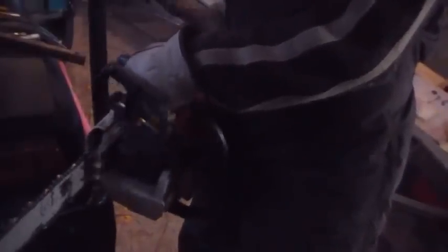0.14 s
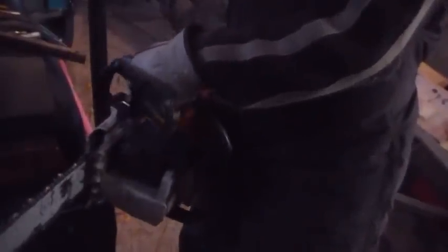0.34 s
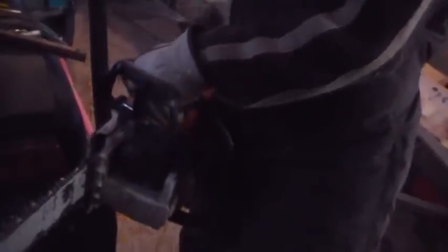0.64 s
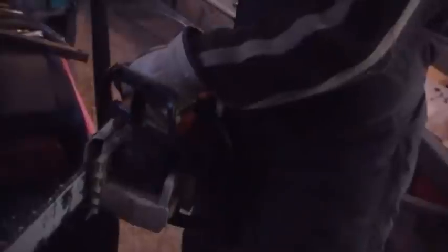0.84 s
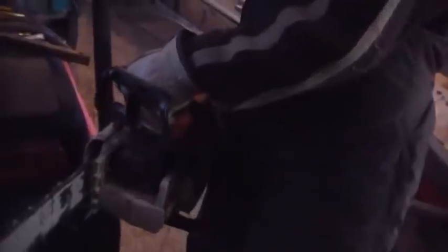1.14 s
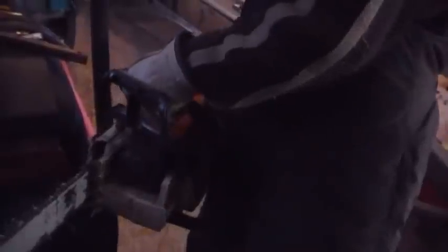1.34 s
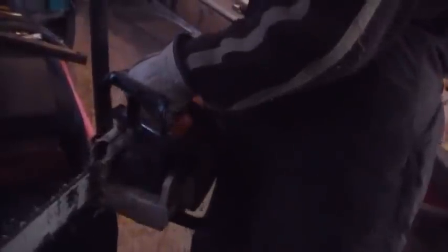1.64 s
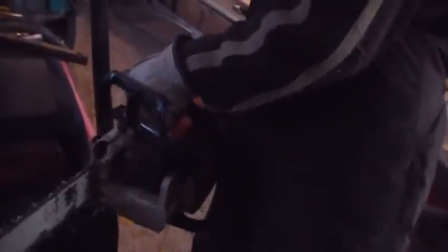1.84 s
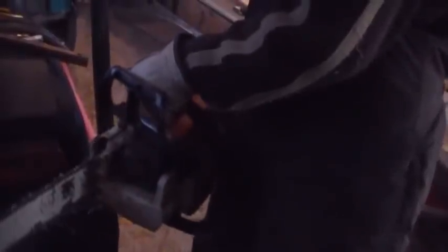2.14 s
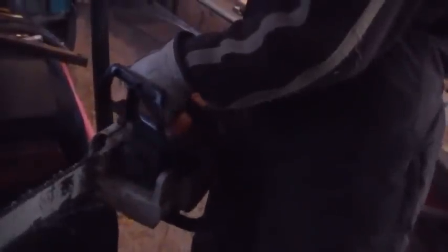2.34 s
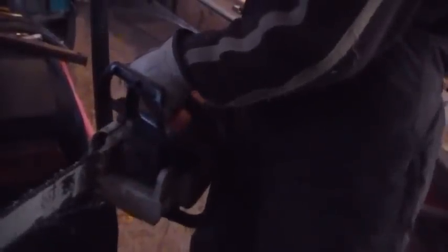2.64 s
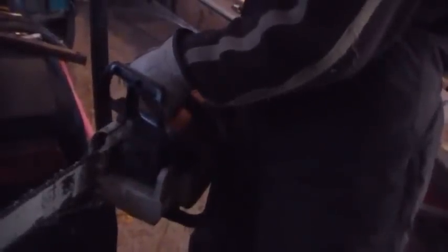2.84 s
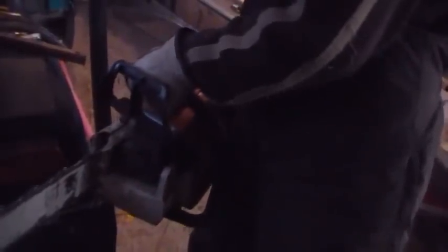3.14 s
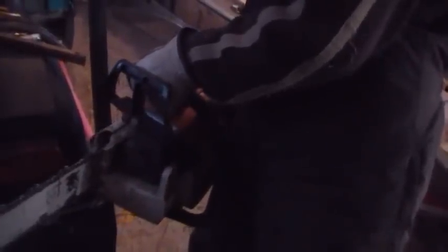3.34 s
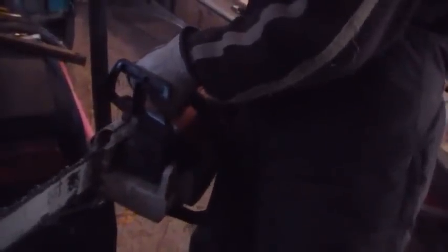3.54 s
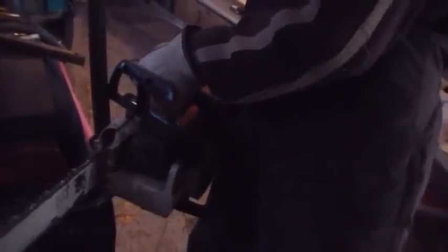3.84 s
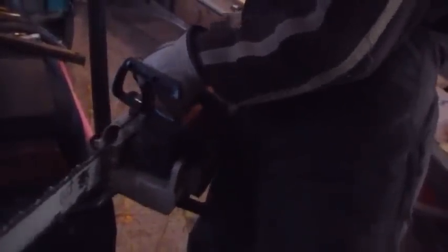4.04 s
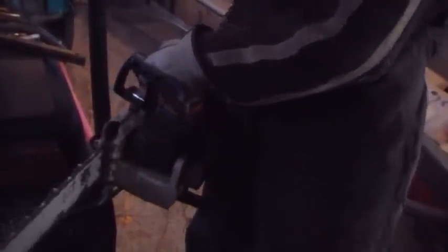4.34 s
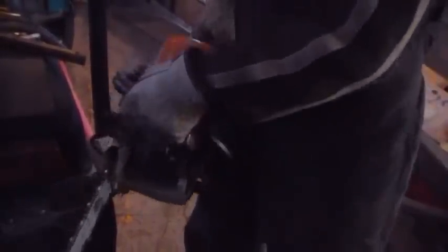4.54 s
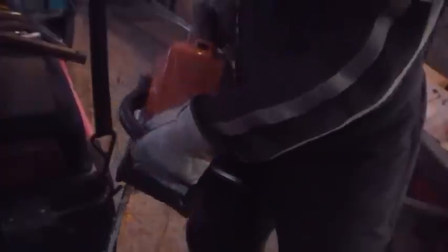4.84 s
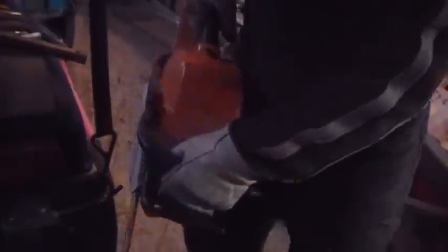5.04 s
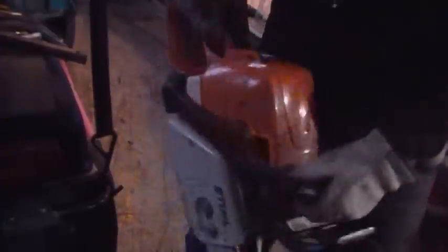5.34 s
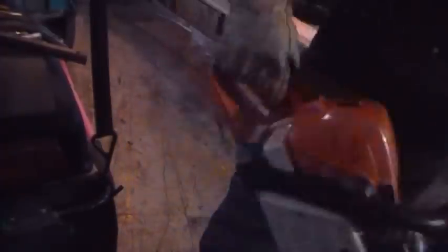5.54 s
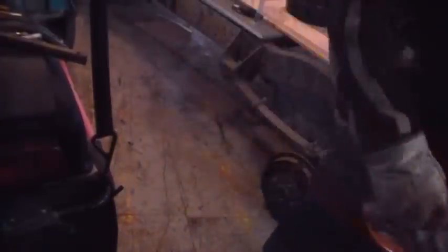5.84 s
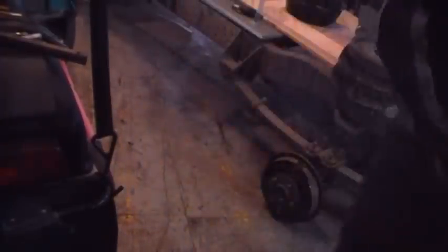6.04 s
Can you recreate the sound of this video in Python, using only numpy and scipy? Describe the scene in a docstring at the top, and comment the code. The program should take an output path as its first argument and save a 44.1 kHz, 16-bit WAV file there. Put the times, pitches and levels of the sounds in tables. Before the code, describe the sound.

A two-stroke chainsaw idles unevenly with rattling metal, is cut off, squeals and clanks to a stop, then is set down with a ringing thud.

```python
"""Two-stroke chainsaw switched off and set down

The saw idles in a workshop, firing hard on every fourth or fifth turn: shaped noise bursts and impulses.
The spark is cut; slowing turns jolt a rattling chain, which squeals, and ringing clanks end the run.
Cloth swishes and scuffs (noise grains), a sole scrapes, knocks sound and the saw lands with a ringing thud.
A soft hiss lies beneath; a thin whine of resonant noise comes up as the engine falls quiet."""
import sys
import numpy as np
from scipy import signal
from scipy.fft import rfft, irfft
from scipy.io import wavfile

SR = 44100
rng = np.random.default_rng(int(sys.argv[2]) if len(sys.argv) > 2 else 0)


def transcribe(u):
    """Save the signal u as a 16-bit wav file named by the first command-line argument.

    u: samples, shape (n,) or (channels, n), limited to [-1, 1]; the rate is SR.
    q: integer samples, one column per channel.
    """
    v = np.clip(np.atleast_2d(u).T, -1, 1)
    q = np.round(v * 32767).astype(np.int16)
    wavfile.write(sys.argv[1], SR, q)


N = 272538
T = np.arange(N) / SR

# turns that stand out, as loud firings or as loud metal slaps with almost no crack:
# (time [s], exhaust crack level [dB], metal slap level [dB])
STRONG_TURNS = [(0.170, -8.5, -20), (0.216, -34, -16), (0.2636, -11, -33), (0.3593, -10, -23),
                (0.456, -7.5, -11), (0.5239, -36, -12), (0.5509, -9, -20), (.594, -22, -10.5),
                (0.617, -35, -7.5), (0.8068, -10, -32), (0.875, -19, -8), (0.9, -8, -22),
                (0.995, -7.5, -22), (1.2446, -9.5, -32), (1.3556, -6.5, -37), (1.4865, -12.5, -32),
                (1.5953, -9, -13), (1.7054, -7.5, -24), (1.889, -37, -12), (1.9132, -8, -17),
                (2.0272, -8, -20), (2.1355, -12.5, -22), (2.2218, -8.5, -19), (2.3305, -9.5, -30),
                (2.4197, -11, -35), (2.507, -10, -29), (2.5952, -12.5, -33), (2.618, -19, -18),
                (2.8021, -13, -41), (2.893, -7.5, -16), (3.21, -11, -40), (3.3278, -7.5, -18),
                (3.4217, -12, -17)]
# the idle hunts slowly up and down, then dies: (time [s], effort [dB])
EFFORT = [(0, -30), (.06, -24.5), (.45, -26), (.78, -22.5), (1.04, -26.5), (1.23, -24.5), (1.43, -27.5),
          (1.58, -25.5), (1.75, -26.5), (1.88, -25), (2.03, -27.5), (2.48, -26.5), (2.79, -21.5),
          (2.95, -24), (3.21, -21), (3.43, -25), (3.65, -25.5), (3.86, -33.5)]
# resonances of the slack chain: (frequency [Hz], width [Hz], relative level [dB])
LOOSE_CHAIN = [(1250, 210, -7), (1700, 70, -4), (2015, 70, -1), (2215, 36, 3), (2510, 100, 4),
               (2720, 70, 2), (3110, 70, 1), (3460, 150, 0), (3980, 60, -7), (4640, 200, 0)]


def amp(db):
    """Decibels to gain."""
    return 10 ** (np.asarray(db) / 20)


def noise():
    """White noise of rms 1."""
    return rng.standard_normal(N)


def through(x, response):
    """Pass x through an impulse response scaled to unit energy."""
    return signal.fftconvolve(x, response / np.linalg.norm(response))[:N]


def colour(x, points, size=4096):
    """Minimum-phase filter with the given (Hz, dB) shape; white noise keeps its level."""
    hz, db = np.transpose(points)
    freqs = np.maximum(np.fft.rfftfreq(size, 1 / SR), 1)
    shape_db = np.interp(np.log(freqs), np.log(hz), db)
    # folding the cepstrum forward in time makes the response causal
    cepstrum = irfft(np.log(amp(shape_db)))
    cepstrum[1:size // 2] *= 2
    cepstrum[size // 2 + 1:] = 0
    return through(x, irfft(np.exp(rfft(cepstrum))))


def ring(x, modes, size=8192):
    """Damped resonances (Hz, width Hz, dB), narrow ones ringing longer; white noise keeps its level."""
    t = T[:size]
    response = np.zeros(size)
    for hz, width, db in modes:
        response += amp(db) * width * np.exp(-np.pi * width * t) * np.cos(2 * np.pi * hz * t)
    return through(x, response)


def blows(times, db):
    """One impulse at each time."""
    out = np.zeros(N)
    inside = (times >= 0) & (times < T[-1])
    np.add.at(out, (times[inside] * SR).astype(int), amp(db)[inside])
    return out


def bursts(times, db, rise, hold, decay, size=8192):
    """Noise bursts that open quickly, stay open briefly and die away (all in s)."""
    t = T[:size]
    shape = (1 - np.exp(-t / rise)) * np.exp(-np.maximum(t - hold, 0) / decay)
    return noise() * signal.fftconvolve(blows(times, db), shape)[:N]


def grains(rate, spread_db):
    """Dense random ticks (rate per s) of uneven size, rms 1."""
    ticks = (rng.random(N) < rate / SR) * noise() * amp(spread_db * noise())
    return ticks / np.std(ticks)


def rub(path, width_hz):
    """One narrow, rough resonance that glides along rows of (s, Hz, dB)."""
    s, hz, db = np.transpose(path)
    lowpass = signal.butter(2, width_hz / 2, fs=SR, output="sos")
    rough = signal.sosfilt(lowpass, noise() + 1j * noise())
    phase = 2 * np.pi * np.cumsum(np.interp(T, s, hz)) / SR
    tone = np.real(rough * np.exp(1j * phase))
    return tone / np.std(tone) * np.interp(T, s, amp(db), left=0, right=0)


def crank_turns():
    """Start of every turn: a whole number of even turns, near idle speed, fits between two strong ones."""
    idle_hz = 44
    strong = np.array(STRONG_TURNS)[:, 0]
    anchors = np.append(strong[0] - 8 / 43.3, strong)
    spans = []
    for start, end in zip(anchors, anchors[1:]):
        turns = round((end - start) * idle_hz)
        spans.append(np.linspace(start, end, turns + 1)[1:])
    return np.concatenate(spans)


def effort(t):
    """Engine effort in dB at times t: slow hunting, less the slump until fresh mixture builds up."""
    full_crack_db, blowdown_s = -7, 0.008
    # the harder the firing, the more spent the cylinder and the weaker the turns after it
    spent_db, spent_power, recharge_s = 11, 5.4, 0.065
    strong, crack_db, _ = np.transpose(STRONG_TURNS)
    db = np.interp(t, *np.transpose(EFFORT))
    for s, strength in zip(strong + blowdown_s, amp(crack_db - full_crack_db)):
        recovery = (t > s) * np.exp(-np.abs(t - s) / recharge_s)
        db = db - spent_db * strength ** spent_power * recovery
    return db


def casing(x, first_db=-4, second_db=-7):
    """The casing rings; as the grip shifts, some of its panels fall silent and others start to buzz."""
    # casing modes throughout, before and after the shift: (frequency [Hz], width [Hz], relative level [dB])
    casing_modes = [(1615, 40, -10), (1822, 40, -8), (1962, 40, -2), (2220, 26, 6), (2520, 45, -5),
                    (2703, 40, -3), (2900, 60, -5), (3020, 40, 0), (3197, 40, -5), (3430, 35, -3),
                    (4240, 110, -8), (4414, 54, -10), (4690, 80, -5), (6216, 50, -8)]
    first_grip = [(1958, 32, 1), (2703, 26, 1), (2855, 30, 1), (3348, 22, 3), (3500, 25, -3),
                  (4212, 30, -3)]
    second_grip = [(2448, 28, 2), (2490, 32, 1), (3060, 50, -4)]
    shifted = np.interp(T, [0.9, 1.2], [0, 1])
    first = amp(first_db) * ring((1 - shifted) * x, first_grip)
    second = amp(second_db) * ring(shifted * x, second_grip)
    return ring(x, casing_modes) + first + second


def idle(puff_db=7.5, scatter_db=1, thump_lag=0.0048, knock_db=-7, bang_db=6.5,
         jet_db=1, tail_db=-4.0, tick_db=29, pulse_db=11):
    """Each turn puffs, slaps and thumps the muffler; a firing knocks, bangs and spits a short bright jet."""
    # modes of muffler and slapped bar: (frequency [Hz], width [Hz], relative level [dB])
    muffler_modes = [(235, 80, -9), (295, 70, -12), (420, 36, -7), (461, 34, 8), (645, 50, 1),
                     (830, 130, -8), (1105, 45, 2.5)]
    slap_modes = [(9122, 85, 6), (9400, 230, -4)]
    # spectra: (frequency [Hz], relative level [dB])
    puff_shape = [(100, -43), (400, -22.5), (1000, -2.5), (1700, 2.5), (2330, 3), (2550, 13), (2800, 8),
                  (3300, 6.5), (3900, 4.5), (4600, 4.5), (5100, 2), (8300, 4), (10000, 9.5), (11500, 3.5),
                  (13000, -0.5), (16000, -9.5)]
    knock_shape = [(200, -24), (1500, -3), (2700, 5.5), (3700, 0), (4600, -4), (5500, -3), (6500, 5),
                   (10000, 4), (12000, 3), (16000, -8)]
    jet_shape = [(500, -13), (2500, -2.5), (4500, -3), (6000, -2.5), (9000, 1), (10500, 2), (12000, -1),
                 (14000, 2), (16000, -4.5)]
    # the crack is bright gas noise; the bang is lower and duller
    crack_shape = [(80, -64), (450, -28), (1000, -4.5), (2000, 6), (3000, 5), (4900, -3.5), (6000, 6.5),
                   (8500, 4), (10700, 8.5), (14000, -1.5), (16000, -11)]
    bang_shape = [(80, -20), (200, -14), (450, -4.5), (1000, 3.5), (1700, 5), (3000, 2.5), (6000, -9),
                  (16000, -43)]
    muffler_shape = [(60, -54), (110, -29), (165, 1), (260, 2.5), (1200, -2.5), (3000, -2.5), (16000, -13.5)]

    times = crank_turns()
    turn_db = effort(times)
    chance = rng.standard_normal((len(times), 4)).T
    strong, crack_db, slap_db = np.transpose(STRONG_TURNS)

    puff_levels = turn_db + puff_db + scatter_db * chance[0]
    puffs = bursts(times, puff_levels, rise=0.0005, hold=0.0032, decay=0.0045)
    slap_times = np.append(times, strong)
    slap_levels = np.append(turn_db + 6.0 + 2.1 * chance[1], slap_db - 5.5)
    slaps = bursts(slap_times, slap_levels, rise=0.00037, hold=0.003, decay=0.0014)
    knocks = bursts(strong, crack_db + knock_db, rise=0.00063, hold=0.0033, decay=0.0021)
    # the jet of burnt gas follows the knock and is over at once
    jets = bursts(strong + 0.0054, crack_db + jet_db, rise=0.0002, hold=0.0012, decay=0.0006)
    cracks = bursts(strong + thump_lag, crack_db + tail_db, rise=0.00024, hold=0.0009, decay=0.0047)
    # the piston strikes the same clean tick into the casing on every turn
    ticks = blows(times, turn_db + tick_db)
    # the pressure pulse keeps one shape, soft unless it fires; the gas noise on top of it differs
    bangs = blows(strong + thump_lag, crack_db + bang_db) + blows(times + thump_lag, turn_db + pulse_db)
    # gas leaves the muffler a few milliseconds after the turn starts, never quite evenly
    thump_times = times + thump_lag + 0.0005 * chance[3]
    thumps = blows(thump_times, turn_db + 10.5 + 1.6 * chance[2]) + amp(-27) * puffs

    muffler = colour(ring(thumps, muffler_modes), muffler_shape)
    firing = colour(knocks, knock_shape) + colour(jets, jet_shape)
    firing = firing + colour(cracks, crack_shape) + colour(bangs, bang_shape)
    metal = amp(-13) * casing(puffs + ticks) + ring(slaps, slap_modes)
    return colour(puffs, puff_shape) + metal + firing + amp(-0.5) * muffler


def chain(settle_db_per_s=34):
    """Links and loose parts chatter with the engine's effort, ring casing and bar, then settle."""
    # bar modes: (frequency [Hz], width [Hz], relative level [dB])
    bar_modes = [(9050, 55, 0), (9230, 70, -7), (9925, 80, -10), (10450, 70, -12), (13600, 400, -22)]
    # spectrum of the rattling links: (frequency [Hz], relative level [dB])
    rattle_shape = [(100, -46.5), (300, -4), (1000, -4.5), (1700, 1.5), (2330, 5.5), (2700, -1.5),
                    (4500, 4), (5300, -7), (8300, -3.5), (10000, -4), (12000, 1), (16000, -46)]
    shake = amp(effort(T) - settle_db_per_s * np.maximum(T - EFFORT[-1][0], 0))
    ticks = shake * grains(rate=9000, spread_db=1.5)
    running = np.interp(T, [3.66, 3.85], [1, 0.3])
    # once the spark is cut the chain goes slack and its own rattle takes over from the casing's
    slack = np.interp(T, [3.45, 3.62], [0, 1])
    metal = amp(-7.5) * ((1 - slack) * casing(ticks) + slack * ring(ticks, LOOSE_CHAIN))
    rattle = amp(-2.5) * colour(ticks, rattle_shape)
    bar = amp(-7.5) * running * ring(ticks, bar_modes)
    return metal + running * (rattle + bar)


def background():
    """Soft hiss that dips briefly after the thud, and a thin whine that comes up once the engine is quiet."""
    # spectrum of the hiss: (frequency [Hz], relative level [dB])
    air_shape = [(30, -12), (120, -50), (250, -6.5), (500, 0), (1000, 4), (3000, 0), (4800, 0),
                 (6500, -0.5), (9000, 5.5), (10300, 7), (12000, 2), (14000, -3), (16000, -27)]
    # resonances of the whine: (frequency [Hz], width [Hz], relative level [dB])
    whine_modes = [(5765, 70, 1.5), (7420, 110, -7), (8450, 90, -5.5), (10690, 150, 7), (11050, 300, -6),
                   (12390, 80, -6), (13050, 120, -8), (13730, 110, -4.5)]
    hiss_db = np.interp(T, [5.85, 6.0, 6.15], [-42.5, -45.5, -43])
    whine_db = np.interp(T, [3.88, 4.0, 4.25, 5.5, 6.0], [-53, -37, -38.5, -36.5, -37.5])
    return amp(hiss_db) * colour(noise(), air_shape) + amp(whine_db) * ring(noise(), whine_modes)


def coasting(count=8):
    """Rows (s, jolt dB, slap dB) of the ever slower turns after the last firing."""
    # a base time plus a drag that grows by a factor every turn
    base_s, drag_s, growth = 0.0222, 0.00036, 1.5
    periods = base_s + drag_s * growth ** (np.arange(count) + 1)
    times = STRONG_TURNS[-1][0] + np.cumsum(periods)
    # jolts and slaps both grow from the first turn to the last
    return np.column_stack([times, np.linspace(-19.5, -17.5, count), np.linspace(-17.5, -16.5, count)])


def run_down():
    """With the spark cut the turns come further apart and jolt the slack chain."""
    # loose jolts of chain and clutch: (time [s], level [dB], slap on the bar [dB])
    loose_jolts = [(3.5126, -34, -10.5), (3.565, -35, -21), (3.633, -21, -27), (3.6616, -16, -7.5),
                   (3.673, -18, -37), (3.7074, -16, -19), (3.74, -18, -17), (3.7615, -28, -27),
                   (3.794, -12, -11.5), (3.822, -24, -48)]
    # jolt spectrum: (frequency [Hz], relative level [dB])
    jolt_shape = [(90, -19), (200, -6), (450, -1.5), (800, -14), (1200, -2), (1600, 3), (2700, 9.5),
                  (4700, 6), (5400, 0), (10000, 2.5), (12000, 0), (16000, -14)]
    # slapped bar modes: (frequency [Hz], width [Hz], relative level [dB])
    slap_modes = [(9122, 85, 6), (9400, 230, -4)]
    times, db, slap_db = np.vstack([coasting(), loose_jolts]).T
    jolts = bursts(times, db, rise=0.00029, hold=0.00088, decay=0.0099)
    slaps = bursts(times, slap_db, rise=0.00021, hold=0.0018, decay=0.0019)
    # slower blows are duller
    bright = colour(jolts, jolt_shape)
    dull = signal.sosfilt(signal.butter(2, 4300, fs=SR, output="sos"), bright)
    slowed = np.interp(T, [3.62, 3.8], [0, 0.65])
    body = (1 - slowed) * bright + 1.3 * slowed * dull
    return body + amp(-6.5) * ring(jolts, LOOSE_CHAIN) + ring(slaps, slap_modes)


def chugs():
    """Over the last slow turns the unfired charge puffs softly out of the muffler."""
    # puffs: (time [s], level [dB])
    soft_puffs = [(3.616, -42), (3.683, -40), (3.758, -35), (3.822, -32), (3.906, -31)]
    # puff spectrum: (frequency [Hz], relative level [dB])
    chug_shape = [(90, -27), (150, -6), (270, 2), (450, 0), (800, -9), (2000, -14), (8000, -28)]
    return colour(bursts(*np.transpose(soft_puffs), rise=0.0014, hold=0.006, decay=0.0071), chug_shape)


def squeal():
    """The chain drags to a halt as a narrow band of rough noise sinking in pitch."""
    # squeal path: (time [s], pitch [Hz], level [dB])
    squeal_path = [(3.79, 4250, -60), (3.84, 4130, -43), (3.88, 4070, -38), (3.92, 4020, -49),
                   (3.97, 4000, -65)]
    return rub(squeal_path, width_hz=76)


def clutch(strike_db=13, grate_db=-6):
    """The piston rocks back: each blow strikes the clutch, grates briefly and leaves the drum ringing."""
    # blows of the piston against compression: (time [s], level [dB])
    clanks = [(3.8976, -17), (3.9293, -22.5), (3.951, -42), (4.009, -13.5), (4.127, -31.5)]
    # drum modes: (frequency [Hz], width [Hz], relative level [dB])
    drum_modes = [(900, 120, -4), (972, 20, 4), (1034, 16, 4), (1150, 130, 1), (1390, 160, 0),
                  (1615, 16, 2), (1680, 110, -4), (2099, 16, 1), (2218, 18, 4.5), (2850, 300, -4),
                  (3192, 14, 9), (3450, 180, -1), (3887, 14, -5)]
    times, db = np.transpose(clanks)
    grating = bursts(times, db, rise=0.0003, hold=0.0022, decay=0.0075)
    drum = ring(blows(times, db + strike_db) + amp(grate_db) * grating, drum_modes)
    return signal.sosfilt(signal.butter(4, [720, 3900], "bandpass", fs=SR, output="sos"), drum)


def clothes():
    """Fibres of sleeve and trousers catch on each other; gloves and soles scuff lower down."""
    # movements of arms and body that swell, hold and fade: (middle [s], length [s], level [dB])
    swishes = [(4.01, 0.21, -41), (4.5, 0.24, -33.5), (4.727, 0.2, -38), (5.252, .24, -31.5),
               (5.604, 0.063, -38), (5.772, 0.24, -30.5), (6.085, 0.045, -38.5), (6.18, 0.034, -29)]
    # scuffing of gloves and soles: (time [s], level [dB])
    scuffing = [(4.3, -82), (4.42, -46.5), (4.89, -45.5), (5.1, -38.5), (5.6, -40.5), (5.88, -45),
                (6.02, -46.5), (6.18, -37.5)]
    # spectra of cloth and scuff: (frequency [Hz], relative level [dB])
    cloth_shape = [(200, -41), (700, -11), (3000, -6), (6000, -7.5), (8500, -0.5), (11000, 1), (13500, -4),
                   (16000, -22)]
    scuff_shape = [(80, -76), (250, -9.5), (450, 3.5), (900, 5), (1600, 6.5), (3000, 0.5), (6000, -3),
                   (15000, -4.5)]
    squareness = 5.2  # 2 is a bell, more is flatter on top
    speed = np.zeros(N)
    for middle, length, db in swishes:
        speed += amp(db) * np.exp(-0.5 * np.abs(2 * (T - middle) / length) ** squareness)
    swish = speed * colour(grains(rate=14000, spread_db=-4.5), cloth_shape)
    s, db = np.transpose(scuffing)
    scuff_gain = amp(np.interp(T, s, db)) * (T > s[0])
    return swish + scuff_gain * colour(grains(rate=2200, spread_db=0.0), scuff_shape)


def knock(s, db, hz):
    """One dull knock fills a band round its pitch, starting with a hard tick; low ones last longer."""
    octaves, tick_db = 1.4, 17
    decay_s = 0.01 / (hz / 1000) ** 1.3
    times = np.array([s])
    hit = bursts(times, np.array([db]), rise=0.00026, hold=0.0022, decay=decay_s)
    hit = hit + blows(times, np.array([db + tick_db]))
    low_hz, high_hz = hz / 2 ** (octaves / 2), hz * 2 ** (octaves / 2)
    band = [(low_hz / 3, -20), (low_hz, 0), (high_hz, 0), (3 * high_hz, -26), (12 * high_hz, -45)]
    return colour(hit, band)


def handling():
    """Knocks of handle and boots, and the set-down: a thud that rings the housing, with small rebounds."""
    # knocks while the saw is carried and set down: (time [s], level [dB], pitch [Hz])
    knock_rows = [(4.529, -30, 1500), (4.653, -37, 1410), (5.057, -37.5, 684), (5.09, -24, 2530),
                  (5.474, -40, 635), (5.534, -37.5, 746), (5.6, -36, 785), (5.944, -39, 800),
                  (5.957, -31, 940), (5.974, -41, 1250), (6.071, -36, 3600), (6.152, -39, 477)]
    # the saw lands and settles: (time [s], level [dB])
    landings = [(5.7715, -20), (5.7815, -27), (5.802, -32), (5.823, -35.5), (5.838, -40)]
    # spectra of thud and crash: (frequency [Hz], relative level [dB])
    thud_shape = [(50, -10), (130, -4), (185, -9.5), (270, -1), (480, 1), (780, 2), (1100, -1.5),
                  (2000, -4.5), (4000, -15), (7000, -29), (15000, -50)]
    crash_shape = [(300, -27), (1400, 3), (2600, 1), (4500, -4), (7000, -12), (15000, -28)]
    # housing modes: (frequency [Hz], width [Hz], relative level [dB])
    housing_modes = [(250, 90, -12), (490, 60, -3), (565, 24, 2), (635, 22, 0), (775, 20, 6), (840, 20, 2),
                     (990, 44, 0), (1430, 70, -1), (1949, 24, -9), (2450, 60, -7)]
    times, db = np.transpose(landings)
    contact = bursts(times, db, rise=0.00023, hold=0.0048, decay=0.012)
    crash = bursts(times, db, rise=0.0002, hold=0.003, decay=0.0063)
    out = amp(-2.0) * colour(contact, thud_shape) + amp(-8) * colour(crash, crash_shape)
    out = out + amp(24.5) * ring(blows(times, db), housing_modes)
    for s, level, hz in knock_rows:
        out = out + knock(s, level, hz)
    return out


def hum():
    """A faint hum comes and goes: very narrow noise near one pitch."""
    # hum path: (time [s], pitch [Hz], level [dB])
    hum_path = [(4.7, 450, -76), (4.78, 450, -56), (4.88, 450, -75), (5.0, 455, -54), (5.16, 455, -53),
                (5.28, 450, -69)]
    return rub(hum_path, width_hz=30)


def sole_scrape():
    """A boot sole scrapes as the body turns: a wider rough band that glides down."""
    # scrape path: (time [s], pitch [Hz], level [dB])
    scrape_path = [(5.18, 1980, -43), (5.3, 1750, -48), (5.39, 1584, -43.5), (5.45, 1420, -42),
                   (5.53, 1287, -50), (5.58, 1200, -68)]
    return rub(scrape_path, width_hz=470)


def workshop(x, wet_db=-9, t60=0.31, first_s=0.00517, sway_hz=1.303, size=22050):
    """A small cluttered room: dense early echoes that lose their treble and shift as the saw sways."""
    t = T[:size]
    tails = rng.standard_normal((2, size)) * np.exp(-np.log(1000) * t / t60) * (t > first_s)
    sway = 2 * np.pi * sway_hz * T
    echoes = through(x * np.cos(sway), tails[0]) + through(x * np.sin(sway), tails[1])
    return x + amp(wet_db) * colour(echoes, [(100, 4.0), (3000, -3.5), (9000, -0.5), (16000, -9)])


def scene():
    """The saw and its handling echo in the room; cloth, scrape, hum and background stay dry."""
    saw = idle() + chain() + run_down() + chugs() + squeal() + clutch()
    moving = clothes() + sole_scrape()
    return (workshop(saw + handling()) + moving + hum() + background())[None]


def record(dry):
    """The small microphone loses the bass, rounds the highest peaks and cuts the top."""
    rounded = np.tanh(1.046 * dry) / 1.326
    thin = signal.sosfilt(signal.butter(4, 145, "highpass", fs=SR, output="sos"), rounded)
    return signal.sosfilt(signal.ellip(10, 0.2, 70, 15850, fs=SR, output="sos"), thin)


dry = scene()
out = record(dry)
transcribe(out)
```